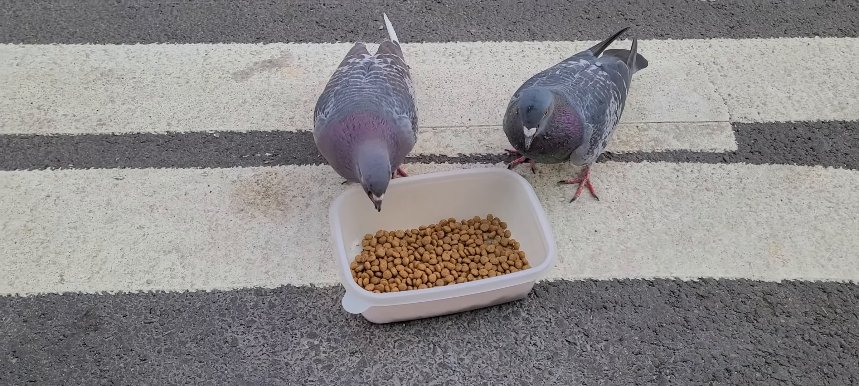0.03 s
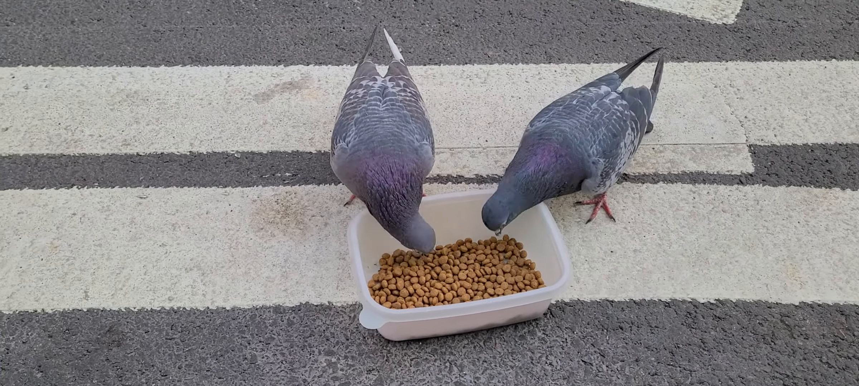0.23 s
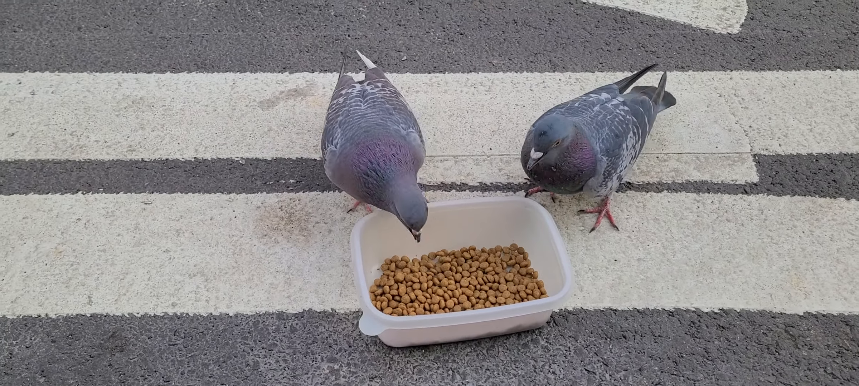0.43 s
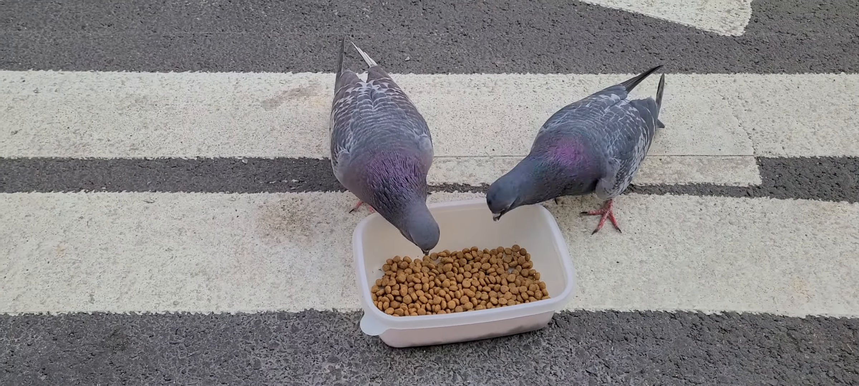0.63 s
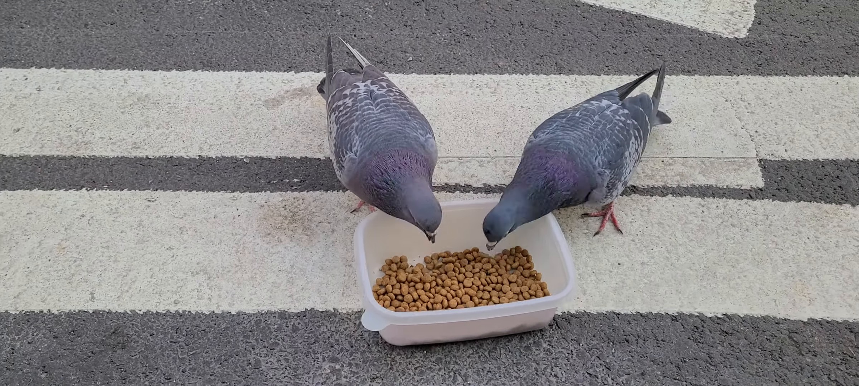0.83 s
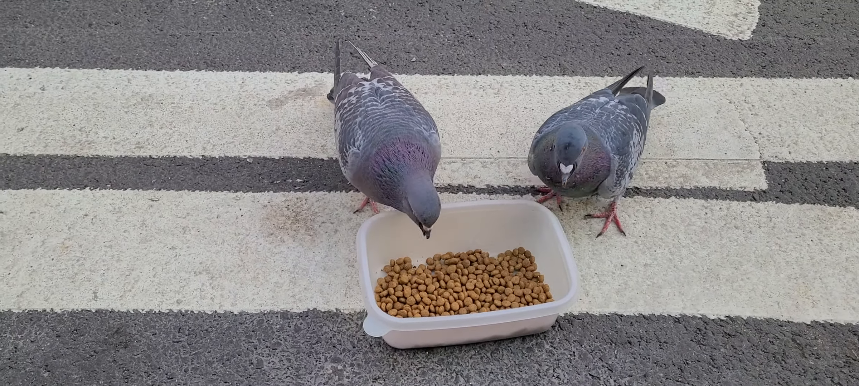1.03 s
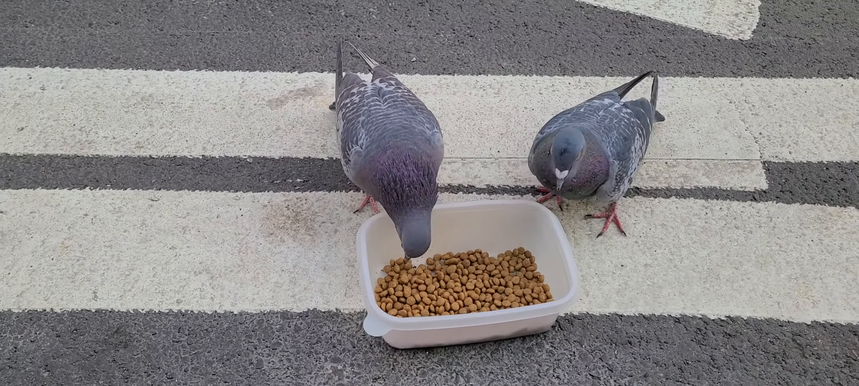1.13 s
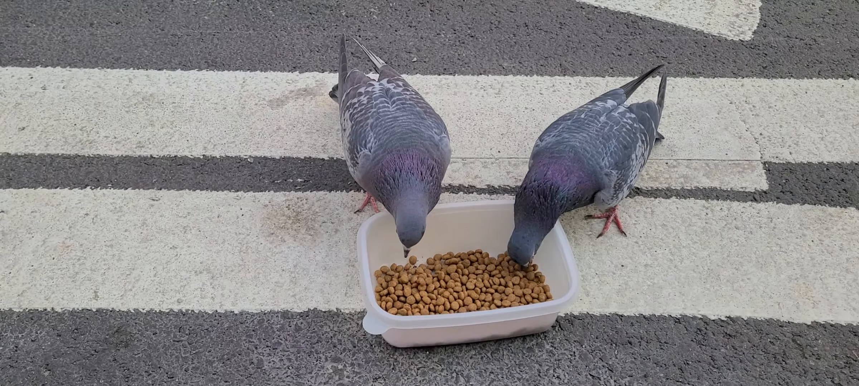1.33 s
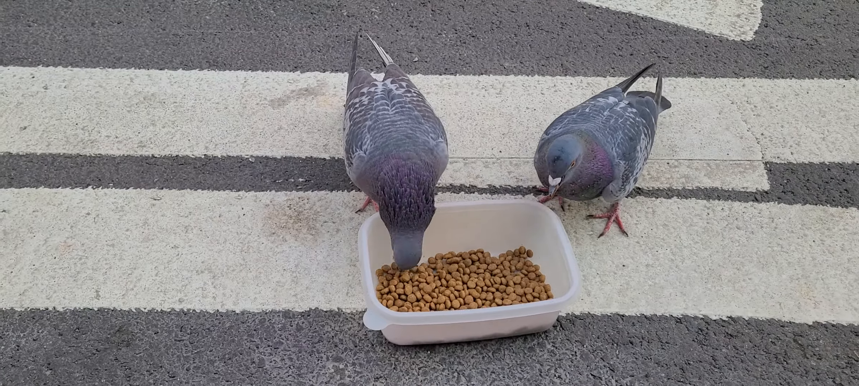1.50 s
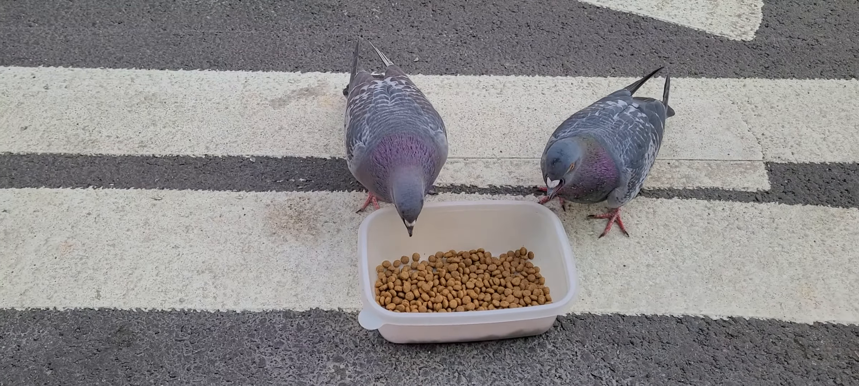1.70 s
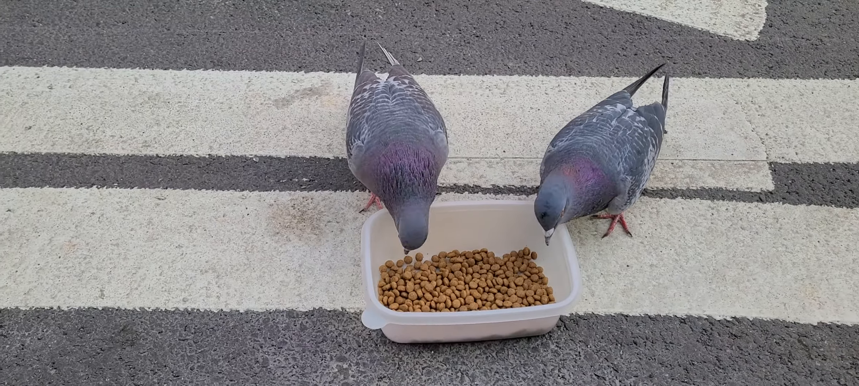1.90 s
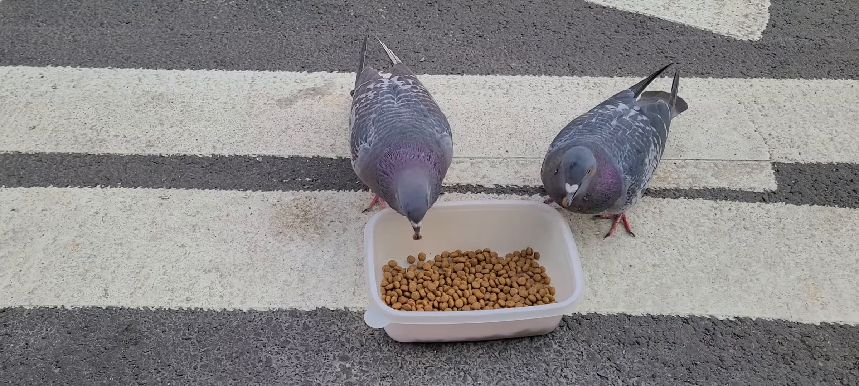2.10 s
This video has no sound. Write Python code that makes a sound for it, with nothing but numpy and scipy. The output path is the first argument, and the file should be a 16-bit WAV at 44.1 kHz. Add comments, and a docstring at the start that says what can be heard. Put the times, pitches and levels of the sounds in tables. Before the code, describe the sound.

Pigeons peck dry pellets in a plastic tub, clicking and rattling over distant traffic.

```python
"""On a street, two pigeons peck dry pellets from a plastic tub, close to a phone.
Distant traffic and a low brush of air lie underneath. Each beak strike clicks, knocks the
tub and jolts nearby pellets; the beak then stirs the heap and flicked pellets rattle back.
The right microphone port is louder and rings in two treble bands."""
import sys
import numpy as np
from scipy import signal
from scipy.fft import rfft, irfft
from scipy.io import wavfile

SR = 44100
rng = np.random.default_rng(int(sys.argv[2]) if len(sys.argv) > 2 else 0)


def digitize_waveform(pressure):
    """Quantize a signal to 16-bit integers and store it at the path in sys.argv[1].

    Rows of a 2-D input are taken as channels; values are limited to [-1, 1].
    """
    field = np.atleast_2d(pressure).T
    bounded = np.clip(field, -1, 1)
    quanta = np.round(bounded * 32767).astype(np.int16)
    wavfile.write(sys.argv[1], SR, quanta)


N = 94815

# Bed of distant traffic and air: frequency_hz, level_db, stereo_likeness (0 wide, 1 centred)
TRAFFIC_BED = [(19.8, -29.5, 0.23), (45, -23, 0.76), (83, -20, 0.99), (108, -29, 1), (167, -32, 0.99),
               (277, -36.5, 0.95), (523, -41.5, 0.69), (1020, -52.5, 0.3), (2160, -53.5, 0.23),
               (5000, -58, 0), (8330, -58.5, 0), (16200, -71.5, 0)]
# Drone of far engines: pitch_hz, level_db
ENGINE_HUM = [(82, -66), (129, -54.5)]
# Sharp hits of beak and pellets: start_s, click_db, wall_knock_db, bottom_thump_db, pellet_pitch_hz
BEAK_STRIKES = [(0.1128, -27, -27, -47, 5900), (0.2458, -28, -7, -35, 4600), (.2492, -2, -9, -34, 4770),
                (.2520, -5, -30, -9, 5400), (.2632, -19, -10, -30, 5000), (0.2749, -7, -32, -16, 4370),
                (.3090, -26, -29, -28, 4900), (0.3235, -13, -33, -40, 4500), (0.3317, -8, -2, -40, 5430),
                (.3808, -10, -16, -12, 5130), (.3885, -3, -11, -38, 4440), (0.7148, -10.5, -41, -12, 4900),
                (0.717, -9.5, -27, -11, 4530), (0.7207, -6.5, -3, -11, 5000),
                (0.7403, -15.5, -43, -38, 5400), (.7821, -4, -6.5, -14, 4630),
                (0.7911, -13, -7.5, -27, 4900), (0.8567, -5, -11, -1, 4500), (.8588, -1, -13.5, -6.5, 5000),
                (0.8616, -13, -15, -22, 5000), (0.907, -16, -8.5, -4.5, 4800),
                (0.9189, -13.5, -10, -16, 4970), (0.9229, -11.5, -14, -8, 4800),
                (1.0095, -29.5, -31, -43, 4650), (1.0780, -48, -42, -19.5, 4450),
                (1.2103, -28, -7.5, -24, 4900), (1.2206, -13.5, -9.5, -3, 5500),
                (1.2292, -14, -10, -34, 4850), (1.2572, -25, -22, -24, 4900), (1.2649, -22, -18, -34, 4900),
                (1.3230, -2, 0, -24, 4400), (1.3246, -0.5, -3, -29, 4260), (1.3324, -14, -31, -33, 4900),
                (1.3645, -9, -15, -10.5, 4850), (1.4773, -34, -34, -43, 4500),
                (1.5008, -15, -10, -27, 4930), (1.5128, -13, -22, -34, 5440), (1.5289, -15, -42, -32, 5350),
                (1.5637, -15.5, -44, -36, 4900), (1.5701, -15, -12, -19, 5130),
                (1.5893, -28, -6, -11.5, 4700), (1.607, -23, -33, -14.5, 4570),
                (1.6578, -48, -25.5, -37, 4700), (1.6715, -35, -30, -42, 4900),
                (1.6896, -29, -43, -42, 5000), (1.934, -33.5, -46, -44, 4670),
                (1.9927, -19.5, -20, -40, 5800), (2.0091, -15, -42, -43, 5670)]
# Pellets stirred or falling back: start_s, end_s, start_db, end_db, relative_knock_db
HEAP_RATTLES = [(0.244, 0.286, -27.5, -24, 6.5), (0.294, 0.35, -35, -39.5, 11.5),
                (0.344, 0.356, -35, -22, 10), (0.361, 0.394, -17, -15.5, 1.5), (.393, 0.407, -29, -40.5, 8),
                (0.731, 0.783, -30, -38, 6), (0.79, .808, -27.5, -23.5, -7), (0.809, 0.845, -41, -40, 14.5),
                (0.851, 0.869, -31.5, -22, 12), (0.876, 0.924, -15, -16.5, 1),
                (1.211, 1.215, -25, -21, -16), (1.219, 1.232, -20, -19.5, -4),
                (1.239, 1.269, -31, -39.5, 9.5), (1.279, 1.307, -30, -29, 8),
                (1.31, 1.389, -42.5, -40, 9.5), (1.499, 1.548, -27.5, -34, 1),
                (1.563, 1.587, -40, -40.5, 13.5), (1.59, 1.608, -20.5, -20, 2),
                (1.611, 1.634, -31, -59, 10), (1.991, 2.017, -41, -35, -1), (2.055, 2.096, -48, -36.5, 11)]
# Tone of a contact's snap: frequency_hz, gain_db
CLICK_EQ = [(100, -9.5), (450, -5.5), (1000, -18.5), (1500, -4), (2500, -0.5), (3600, -1.5), (5000, 3),
            (6700, 2.5), (9000, -2), (12000, -9.5), (16000, -18)]
# Modes of the tub walls, the knock: pitch_hz, level_db, t60_s
WALL_MODES = [(1301, -34.5, 0.033), (1515, -36, 0.032), (1641, -32, 0.036), (1839, -30, 0.02),
              (2090, -38.5, 0.052), (2212, -29, 0.02), (2977, -37.5, 0.049), (3215, -36, 0.013),
              (4400, -61, 0.0086)]
# Modes of the tub's loaded bottom, the thump: pitch_hz, level_db, t60_s
BOTTOM_MODES = [(204, -43, 0.064), (400, -36, 0.0057), (627, -36.5, 0.016), (790, -39, 0.056),
                (910, -41, 0.038), (1165, -36, 0.021)]
# Tone of the microphone ports: frequency_hz, left_db, right_db
PORT_EQ = [(493, -2, -2), (937, 4.5, 7), (1510, 3, 8), (1847, 0, 15), (2216, -4, 19), (2810, 1.5, 8),
           (3530, 2, 8.5), (4500, -4, 14.5), (5440, -6.5, 15), (6585, -2, 3.5), (8600, -2, -17),
           (8700, -14, 0.5), (11100, -6, -3.5), (16000, 0.5, -3.5)]


def undb(db):
    """Decibels to gain."""
    return 10 ** (np.asarray(db) / 20)


def convolve(x, response):
    """Pass a sound through an impulse response."""
    return signal.fftconvolve(x, response)[:len(x)]


def colour(x, hz, db, size=4096):
    """Minimum-phase EQ drawn through frequency and gain points."""
    bins_hz = np.maximum(np.arange(size // 2 + 1) * SR / size, 1)
    gain = undb(np.interp(np.log(bins_hz), np.log(hz), db))
    cepstrum = irfft(np.log(gain))
    cepstrum[1:size // 2] *= 2
    cepstrum[size // 2 + 1:] = 0
    return convolve(x, irfft(np.exp(rfft(cepstrum))))


def drift(per_s):
    """Slow random modulation with a spread near 1."""
    knots = rng.standard_normal(512)
    return np.interp(np.arange(N) / SR * per_s, np.arange(len(knots)), knots)


def echoes(x, decay_s, size):
    """Dense reflections of unit energy that fall by 1 / e every decay_s."""
    t = np.arange(size) / SR
    tail = rng.standard_normal(size) * np.exp(-t / decay_s) * (1 - np.exp(-2 * t / decay_s))
    return convolve(x, tail / np.linalg.norm(tail))


def traffic():
    """Steady far traffic, centred in the bass and wide on top, with a wavering engine hum."""
    hz, db, likeness = np.array(TRAFFIC_BED).T
    likeness = np.minimum(likeness, 0.99)
    mid = colour(rng.standard_normal(N), hz, db + 10 * np.log10((1 + likeness) / 2))
    side = colour(rng.standard_normal(N), hz, db + 10 * np.log10((1 - likeness) / 2))
    hum = np.zeros(N)
    for pitch_hz, level_db in ENGINE_HUM:
        level = undb(level_db) * (1 + 0.5 * drift(per_s=7.48))
        wavering_hz = pitch_hz * (1 + 0.0246 * drift(per_s=9.84))
        hum += level * np.sin(2 * np.pi * np.cumsum(wavering_hz) / SR)
    return np.array([mid + side, mid - side]) + hum


def breeze(cutoff_hz=49.7, gain_db=-26, swing_db=4):
    """Air brushes one microphone port: a low, unsteady rumble."""
    gusts = undb(gain_db + swing_db * drift(per_s=4.75))
    lowpass = signal.butter(2, cutoff_hz, fs=SR, output="sos")
    return gusts * signal.sosfilt(lowpass, rng.standard_normal(N))


def pellet_click(snap, pitch_hz, ring_db=6.5, crunch_db=-4.5, crossover_hz=6380):
    """A struck pellet snaps and rings briefly; its dry crust crumbles for a crisp top end."""
    lowpass = signal.butter(2, crossover_hz, fs=SR, output="sos")
    highpass = signal.butter(2, crossover_hz, "high", fs=SR, output="sos")
    ring = signal.lfilter(*signal.iirpeak(pitch_hz, Q=6.7, fs=SR), snap)
    body = signal.sosfilt(lowpass, snap + undb(ring_db) * ring)
    crunch = signal.sosfilt(highpass, echoes(snap, decay_s=0.00059, size=len(snap)))
    return colour(body + undb(crunch_db) * crunch, *np.array(CLICK_EQ).T)


def tub_ring(modes, t, weight_spread=0.54, detune_spread=0.015):
    """Short plastic modes, weighted and detuned anew for each spot that is hit."""
    hz, db, t60_s = np.array(modes).T[:, :, None]
    weight, detune = rng.standard_normal((2, len(modes), 1))
    polarity = (-1) ** np.arange(len(modes))[:, None]
    levels = undb(db) * (polarity + weight_spread * weight)
    tones = np.sin(2 * np.pi * hz * (1 + detune_spread * detune) * t)
    return np.sum(levels * tones * np.exp(-np.log(1000) * t / t60_s), axis=0)


def contact(pitch_hz, reflections_db=-6.5, size=4096):
    """Click, knock and thump of one spot, reflected inside the tub: ports x layers x samples."""
    t, snap = np.arange(size) / SR, signal.unit_impulse(size)
    layers = pellet_click(snap, pitch_hz), tub_ring(WALL_MODES, t), tub_ring(BOTTOM_MODES, t)
    right_lag_s = abs(rng.normal(50e-6, 40e-6))  # depends on the spot
    paths = [np.roll(snap, delay) + undb(reflections_db) * echoes(snap, decay_s=0.002, size=size)
             for delay in (0, int(right_lag_s * SR))]
    return np.array([[convolve(layer, path) for layer in layers] for path in paths])


def beak_strikes():
    """Single sharp hits of beak and pellets, each at its own spot in the tub."""
    out = np.zeros((2, N))
    for start_s, *levels_db, pitch_hz in BEAK_STRIKES:
        i = int(start_s * SR)
        hit = (undb(levels_db) @ contact(pitch_hz))[:, :N - i]
        out[:, i:i + hit.shape[1]] += hit
    return out


def grains(per_s, spread_db=4.5):
    """Randomly timed ticks of uneven size, around 1."""
    ticks = rng.random(N) < per_s / SR
    sizes = undb(spread_db * np.clip(rng.standard_normal(N), -2, 2))
    train = ticks * sizes * rng.choice([-1, 1], N)
    return train / np.sqrt(np.mean(train[ticks] ** 2))


def heap_motion(jolt_db=-21.5, jolt_s=0.0067, fade_s=0.002, thump_db=-5):
    """Click, knock and thump envelopes of pellets jolted by a strike, stirred or falling back."""
    t, power = np.arange(N) / SR, np.zeros((3, N))
    for start_s, *levels_db, _ in BEAK_STRIKES:
        i = int(start_s * SR)
        jolt = undb(jolt_db) * np.exp(-t[:N - i] / jolt_s)
        power[:, i:] += (undb(levels_db)[:, None] * jolt) ** 2
    for start_s, end_s, start_db, end_db, knock_db in HEAP_RATTLES:
        gate = np.clip(np.minimum(t - start_s, end_s - t) / fade_s + 0.5, 0, 1)
        ramp = undb(np.interp(t, [start_s, end_s], [start_db, end_db]))
        power += (undb([[0], [knock_db], [thump_db]]) * gate * ramp) ** 2
    return np.sqrt(power)


def pellet_rattle(spots=10, centre_hz=4900, spread_octaves=0.38, stray_db=-40):
    """Pellets collide all over the moving heap; stray ones tick as they settle between pecks."""
    collisions = heap_motion() * grains(per_s=1200) + undb(stray_db) * grains(per_s=35)
    spot_hit = rng.integers(spots, size=N)
    pitches_hz = centre_hz * 2 ** (spread_octaves * np.linspace(-1, 1, spots))
    out = np.zeros((2, N))
    for spot, pitch_hz in enumerate(pitches_hz):
        triggers = collisions * (spot_hit == spot)
        layers = signal.oaconvolve(triggers[None], contact(pitch_hz), axes=2)
        out += layers.sum(axis=1)[:, :N]
    return out


def street_echo(pecks, level_db=-22, t60_s=0.21):
    """The street throws back a faint, short tail."""
    return undb(level_db) * np.array([echoes(x, t60_s / np.log(1000), size=SR) for x in pecks])


def scene():
    """Close pecking over the traffic bed, with a separate breeze on each side."""
    pecks = beak_strikes() + pellet_rattle()
    return pecks + street_echo(pecks) + traffic() + np.array([breeze(), breeze()])


def record(dry, top_hz=15800):
    """Each port colours its channel; the phone clips at full scale and cuts the top."""
    hz, *ports_db = np.array(PORT_EQ).T
    coloured = [colour(x, hz, db) for x, db in zip(dry, ports_db)]
    high_cut = signal.ellip(10, 0.2, 95, top_hz, fs=SR, output="sos")
    return signal.sosfilt(high_cut, np.clip(coloured, -1, 1))


dry = scene()
out = record(dry)
digitize_waveform(out)
```